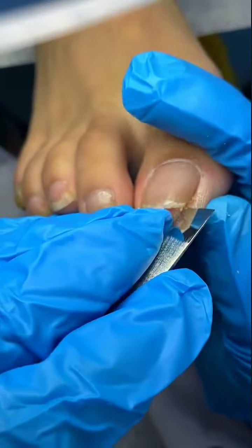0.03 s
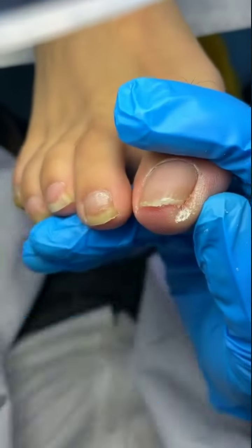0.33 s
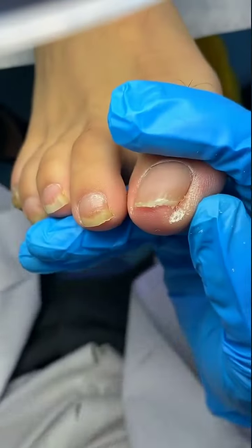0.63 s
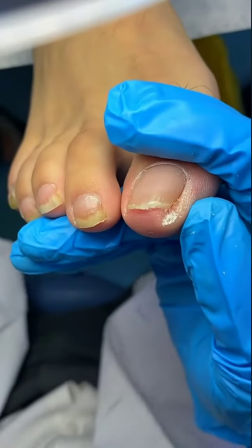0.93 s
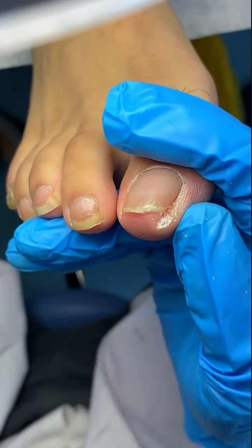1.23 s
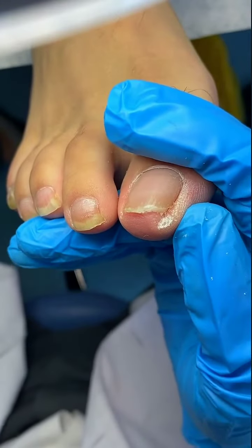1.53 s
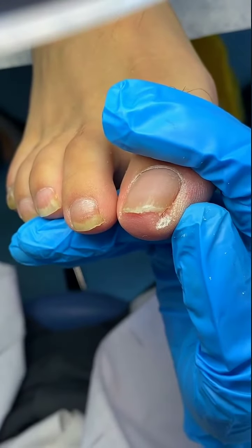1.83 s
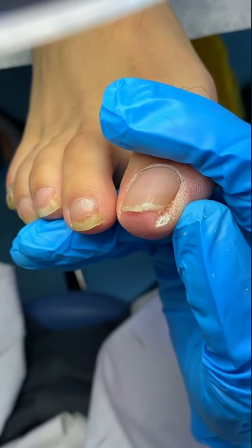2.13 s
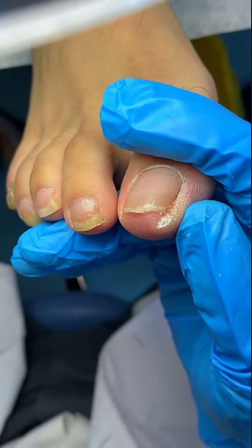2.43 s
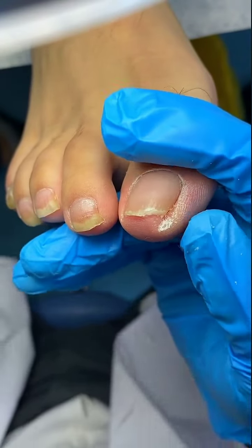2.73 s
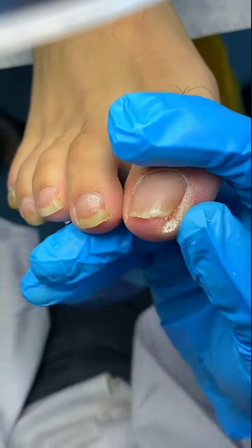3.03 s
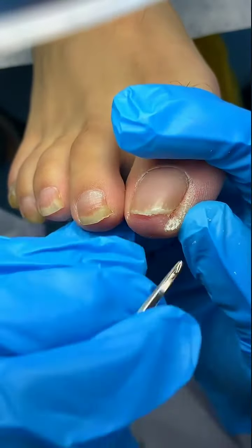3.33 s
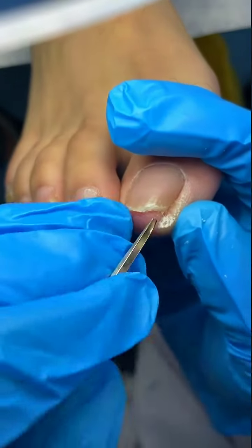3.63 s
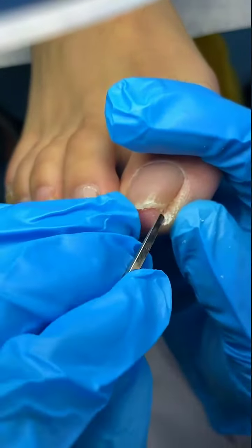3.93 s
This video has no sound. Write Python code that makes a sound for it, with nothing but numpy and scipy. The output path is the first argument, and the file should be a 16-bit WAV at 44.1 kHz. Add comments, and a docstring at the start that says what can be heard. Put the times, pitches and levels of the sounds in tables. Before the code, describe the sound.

Small steel instruments clink on a metal tray over quiet ventilation hum and rustling.

```python
"""In a small, fairly live room, steel instruments are put down on a metal tray and another is picked up.
Each impact gives a short clatter and excites the natural modes of tray and instrument, which ring on;
the trolley underneath answers with dull, heavily damped knocks. Close by, gloves and sleeves make
friction noise over the steady hum of the ventilation."""
import sys
import numpy as np
from scipy import signal
from scipy.fft import rfft, irfft
from scipy.io import wavfile

SR = 44100
rng = np.random.default_rng(int(sys.argv[2]) if len(sys.argv) > 2 else 0)


def wrap_up_sound(samples):
    """Save the sound to the file named by the first command line argument, as 16-bit audio."""
    columns = np.atleast_2d(samples).T
    # keep every value between -1 and 1, then stretch to whole-number steps
    tamed = np.clip(columns, -1, 1)
    steps = np.round(tamed * 32767).astype(np.int16)
    wavfile.write(sys.argv[1], SR, steps)


N = 176400
T = np.arange(N) / SR
HZ = np.maximum(np.fft.rfftfreq(N, 1 / SR), 1)
ATTACK_S = 0.00074

# steel lands on the tray and bounces: start_s, clatter_db, tray_ring_db, edge_hz, clatter_t60_s
LANDINGS = [(0.646, -20, -8.5, 4170, 0.052), (0.653, -23, -8.5, 4170, 0.034),
            (0.8175, -19.5, -0.5, 7140, 0.072)]


def from_db(db):
    """Amplitude ratio of a level in decibels."""
    return 10 ** (np.asarray(db) / 20)


def unit_rms(x):
    """Normalisation to an rms of 1."""
    return x / np.sqrt(np.mean(x ** 2) + 1e-20)


def at_hz(points, hz=HZ):
    """Interpolation of a curve on a logarithmic frequency axis."""
    frequency, value = np.transpose(points)
    return np.interp(np.log(hz), np.log(frequency), value)


def noise(gain):
    """Spectral shaping: white noise weighted by a gain at each frequency, at unit rms."""
    return unit_rms(irfft(rfft(rng.standard_normal(N)) * gain, N))


def diffuse(gain):
    """Diffuse field: stereo noise whose two sides are coherent in the bass and only partly so above."""
    # likeness of left and right: frequency_hz, coherence
    coherence_curve = [(100, 1), (180, 1), (350, 0.94), (700, 0.24), (1400, 0.37), (3000, 0.43),
                       (6000, 0.06), (12000, 0.9)]
    coherence = at_hz(coherence_curve)
    weights = np.sqrt([1 + coherence, 1 - coherence])
    mid, side = irfft(rfft(rng.standard_normal((2, N))) * gain * weights, N)
    return unit_rms(np.array([mid + side, mid - side]))


def struck(age, t60, rise_s=ATTACK_S):
    """Damped vibration: a quick rise, then exponential decay by 60 dB in t60 seconds."""
    age = np.maximum(age, 0)
    return (1 - np.exp(-age / rise_s)) * np.exp(-np.log(1000) * np.minimum(age / t60, 2))


def contact(start, db, t60, colour, edge_hz=SR):
    """Modal overlap: an impact's dense, short-lived resonances merge into a burst of noise."""
    gain = from_db(at_hz(colour)) / np.sqrt(1 + (HZ / edge_hz) ** 4)
    return from_db(db) * struck(T - start, t60) * noise(gain)


def ring(start, db, modes, spread_hz, rise_s=ATTACK_S, count=5):
    """Free vibration: each decaying mode is a cluster of close partials that beat."""
    out, first = np.zeros(N), int(start * SR)
    span = slice(first, first + SR)
    age = T[span] - start
    for hz, mode_db, t60 in modes:
        offsets = np.linspace(-1, 1, count) + rng.uniform(-1.16, 1, count) / count
        partials = hz + spread_hz * offsets
        waves = np.sin(2 * np.pi * (partials[:, None] * age + rng.random((count, 1))))
        envelope = struck(age, t60, rise_s)
        tone = envelope * (np.hanning(count + 2)[1:-1] @ waves)
        to_sine_energy = np.sqrt(np.sum(envelope ** 2) / (2 * np.sum(tone ** 2)))
        out[span] += from_db(db + mode_db) * tone * to_sine_energy
    return out


def rustle(strokes, colour):
    """Friction noise swells and fades with each stroke; incoherent strokes add in power."""
    power = sum(from_db(db) ** 2 * np.exp(-2 * ((T - peak) / np.where(T < peak, rise, fall)) ** 2)
                for peak, rise, fall, db in strokes)
    return np.sqrt(power) * diffuse(from_db(at_hz(colour)))


def ventilation(air_db=-32.5):
    """Broadband air noise with hum lines, which waver because each is a narrow band of noise."""
    # hum lines: centre_hz, level_db, half_width_hz
    lines = [(44.8, -42, 1.3), (58.6, -38, 1.3), (91.05, -36.5, 5.8), (202.2, -49, 5.3), (338.6, -52, 5.5),
             (520.7, -55.5, 2.1), (754, -62.5, 24)]
    # spectrum of the moving air: frequency_hz, level_db
    air = [(12, -49), (20, -4), (30, -5.5), (44, 3.5), (95, -9.5), (109, -15.5), (122, -9.5), (196, -18),
           (306, -13), (362, -20.5), (478, -22), (534, -17.5), (597, -23), (985, -24.5), (1670, -33.5),
           (2470, -34), (2680, -36), (5000, -39.5), (6100, -46.5), (6720, -59), (15500, -57)]
    hum = sum(from_db(db) * noise(1 / (1 + ((HZ - hz) / width) ** 2)) for hz, db, width in lines)
    return hum + from_db(air_db) * diffuse(from_db(at_hz(air)))


def pick_rings():
    """Weak excitation: two picks, barely touched, ring faintly in a few modes."""
    # modes of the finer pick and of the other: pitch_hz, level_db, t60_s
    fine_pick = [(2694, -53, .2), (3182, -47, .17)]
    pick = [(2444, -57, .3), (2694, -51, .35), (2943, -52, .35)]
    return (ring(0.005, 1.5, fine_pick, spread_hz=11, rise_s=0.00089)
            + ring(0.086, 4, pick, spread_hz=14, rise_s=0.0028)
            + ring(0.457, 7.5, pick, spread_hz=35, rise_s=0.0049))


def gloves(crinkle_db=1.5, crinkle_hz=118, snap_wet_db=-25):
    """Many tiny contacts modulate the friction noise of sliding gloves; light snaps excite the room."""
    # light snaps: start_s, level_db, t60_s
    snap_events = [(0.069, -34, 0.017), (0.814, -31.5, 0.029), (0.938, -39, 0.04), (1.395, -41.5, 0.038),
                   (2.454, -42, .04), (3.024, -53, .06)]
    # sliding strokes: peak_s, rise_s, fall_s, level_db
    slides = [(0.305, 0.029, 0.054, -41), (0.44, 0.32, 0.17, -48), (0.96, 0.39, 0.19, -55.5),
              (1.55, 0.25, .15, -59.5), (2.12, 0.21, 0.068, -63), (2.6, 0.31, 0.55, -54),
              (3.02, 0.1, 0.031, -42), (3.25, 0.13, 0.19, -55)]
    # spectrum of the gloves: frequency_hz, level_db
    colour = [(2000, 3), (5700, 6.5), (7200, -13), (9000, 0), (11000, 2.5), (13000, -0.5), (15500, -4)]
    snaps = sum(contact(*snap, colour) for snap in snap_events)
    flutter = noise(1 / (1 + (HZ / crinkle_hz) ** 2))
    crinkle = unit_rms(from_db(crinkle_db * flutter))
    return crinkle * rustle(slides, colour) + snaps + from_db(snap_wet_db) * room(snaps)


def clothing():
    """Sliding friction: a dull rub as the body shifts, a brighter hiss as sleeves brush."""
    # movements of body and sleeves: peak_s, rise_s, fall_s, level_db
    shifts = [(0.29, 0.062, 0.1, -40.5), (0.65, 0.02, 0.019, -35.5), (2.82, 0.082, 0.093, -33),
              (3.04, 0.097, 0.098, -34.5), (3.5, 0.45, 0.52, -41.5), (3.92, 0.073, 0.097, -34)]
    brushes = [(0.31, 0.068, 0.25, -45), (2.56, 0.22, 0.38, -51), (2.84, 0.19, 0.17, -41.5),
               (2.99, 0.053, 0.29, -45.5), (3.48, 0.046, 0.16, -51), (3.93, 0.094, 0.11, -46)]
    # their spectra: frequency_hz, level_db
    rub = [(70, -49), (150, -1), (215, 4.5), (330, -4.5), (500, -6), (1000, -15), (3000, -47)]
    sleeve = [(200, -16), (600, -3.5), (1500, -1), (2500, 4.5), (4000, 2.5), (5900, -7), (6800, -36),
              (15000, -17)]
    return rustle(shifts, rub) + rustle(brushes, sleeve)


def trolley_knocks(spread_hz=23):
    """Blows on the trolley excite the low, heavily damped modes of its shelf and frame."""
    # dull knocks: start_s, level_db, t60_s, edge_hz
    blows = [(0.587, -22, 0.029, 776), (0.82, -23, 0.056, 485), (1.321, -29.5, 0.25, 1260),
             (1.398, -23.5, 0.26, 2460), (2.456, -29.5, 0.41, 870), (2.785, -30.5, 0.29, 735)]
    # their spectrum: frequency_hz, level_db
    colour = [(80, -6.5), (200, 0), (380, -1.5), (580, -5.5), (800, -11), (1200, -12.5), (2500, -14.5),
              (6000, -25)]
    # blows on shelf and frame: start_s, level_db
    thuds = [(0.589, -12), (1.322, -10), (1.398, -1), (2.456, -12), (2.786, -16)]
    bumps = [(1.405, 0), (1.528, -12)]
    # modes of shelf and frame: pitch_hz, level_db, t60_s
    shelf_modes = [(347, -21, 0.087), (430, -24.5, 0.22), (760, -22, 0.044), (843, -29.5, 0.079)]
    frame_modes = [(125, -10.5, 0.091), (187.5, -21, .1)]
    knocks = sum(contact(start, db, t60, colour, edge_hz) for start, db, t60, edge_hz in blows)
    shelf = sum(ring(start, db, shelf_modes, spread_hz) for start, db in thuds)
    frame = sum(ring(start, db, frame_modes, spread_hz, rise_s=0.0063) for start, db in bumps)
    return knocks + shelf + frame


def steel_scrapes():
    """Friction of steel slipping on steel gives brief bursts of noise, strongest at 2-3 kHz."""
    # slips: start_s, level_db, t60_s
    slips = [(0.599, -23.5, 0.0068), (1.395, -28.5, 0.039), (2.452, -28.5, 0.052), (3.666, -33.5, 0.016)]
    # their spectrum: frequency_hz, level_db
    colour = [(500, -18), (1750, 1), (2300, 8), (2900, 7), (3600, -1.5), (5400, -7.5), (6300, -23),
              (7200, -25.5)]
    return sum(contact(*slip, colour) for slip in slips)


def steel_ticks():
    """Hard contacts of steel on steel are brief, so their spectrum is broad."""
    # ticks: start_s, level_db, t60_s
    ticks = [(0.599, -37, 0.0072), (0.6468, -33, 0.018), (0.8172, -46, 0.008), (2.709, -21.5, 0.013),
             (2.7132, -25, 0.021), (2.719, -28, .025)]
    # their spectrum: frequency_hz, level_db
    colour = [(1200, -6), (2200, -6), (2900, -0.5), (5000, -1.5), (5600, 1.5), (6400, -21), (8000, -25)]
    return sum(contact(*tick, colour) for tick in ticks)


def instrument_rings():
    """Struck steel vibrates in inharmonic modes: lightly damped ones ring, heavily damped ones clack."""
    # modes of each instrument, and of the handle's clack on the tray: pitch_hz, level_db, t60_s
    blade = [(2645, -35, .5), (2700, -38, .5), (2785, -34, .55), (2805, -36, .45), (2935, -37, .4),
             (3128, -30, .12), (3900, -34, .06), (4430, -48, .4), (5066, -47, .3)]
    clack = [(3943, -18.5, 0.021), (4880, -29.5, 0.027)]
    handle = [(3536, -41, .46), (3655, -41, .45), (3770, -43, .3), (3865, -38, .4), (3911, -33, .36),
              (4020, -41, .3), (4134, -45, .5), (4528, -41, .5), (4780, -46, .35), (4910, -40, .35),
              (5216, -45, .38), (5373, -47, .2), (6095, -52, .4), (6422, -46, .33)]
    probe = [(1730, -43, .45), (2509, -41, .35), (3515, -25, .42), (6585, -54, .7), (6594, -54, .7),
             (8280, -61, .3)]
    nippers = [(2207, -28, 0.084), (2490, -25.5, 0.05), (3270, -30.5, 0.059), (3780, -32, 0.095),
               (4000, -41, 0.047), (4720, -36, 0.043), (4910, -26, 0.028), (5220, -31, 0.036),
               (5470, -40, 0.026), (6570, -44, 0.086)]
    tweezers = [(2300, -46, 0.09), (2560, -47, .09)]
    return (ring(0.645, 0, blade, spread_hz=23, rise_s=0.00088)
            + ring(0.8164, 5, clack, spread_hz=44, rise_s=0.00042)
            + ring(0.818, 1, handle, spread_hz=14.3, rise_s=0.002)
            + ring(0.825, -0.5, clack, spread_hz=26, rise_s=0.00038)
            + ring(1.407, -1.5, probe, spread_hz=0.29, rise_s=0.021)
            + ring(2.7075, 1.5, nippers, spread_hz=145, rise_s=0.00037)
            + ring(2.726, -8.5, nippers, spread_hz=140, rise_s=0.001)
            + ring(3.461, 6, tweezers, spread_hz=150, rise_s=0.0046))


def tray_clatter():
    """Impact noise: each landing briefly excites many resonances at once."""
    # spectrum of the clatter: frequency_hz, level_db
    colour = [(300, -41), (800, -21), (1220, 4.5), (1430, -7), (2050, 3.5), (2750, 2.5), (3350, -6),
              (3900, 3), (4300, -12), (5100, -3.5), (6200, -10), (7000, -20), (15000, -15)]
    return sum(contact(start, db, t60, colour, edge_hz) for start, db, _, edge_hz, t60 in LANDINGS)


def tray_rings():
    """The tray is a thin plate whose bending modes ring on after each landing."""
    # plate modes: pitch_hz, level_db, t60_s
    modes = [(1066, -42, .45), (1222, -39.5, .45), (1272, -40.5, .55), (1578, -41, .6), (1694, -42, .6),
             (1960, -40, .45), (2008, -38, .45), (2209, -40.5, .45), (2363, -44, .6), (2533, -42, .8),
             (2604, -37.5, .6), (2715, -40, .55), (3170, -45, .35)]
    return sum(ring(start, db, modes, spread_hz=16.4) for start, _, db, _, _ in LANDINGS)


def near_echoes(x, level_db=-3, earliest_s=0.001, latest_s=0.012, count=6):
    """Early reflections from tray rim, trolley and wall: delayed copies, different on each side."""
    lags = (rng.uniform(earliest_s, latest_s, (2, count)) * SR).astype(int)
    echoes = [sum(rng.choice([-1, 1]) * np.pad(x, (lag, 0))[:N] for lag in side) for side in lags]
    return from_db(level_db) * np.array(echoes) / np.sqrt(count)


def room(x, first_echo_s=0.0051, bands=9):
    """Reverberation: convolution with a diffuse tail that decays at its own rate in each band."""
    # reverberation time: frequency_hz, t60_s
    decay = [(150, 0.98), (600, 0.75), (2500, 0.93), (5000, 0.55), (12000, 0.28)]
    spectrum, tail = rfft(diffuse(1)), 0
    edges = np.geomspace(60, SR / 2, bands + 1)
    for low, high in zip(edges, edges[1:]):
        band = irfft(spectrum * ((HZ >= low) & (HZ < high)), N)
        envelope = struck(T - first_echo_s, at_hz(decay, np.sqrt(low * high)))
        tail = tail + band * envelope / np.sqrt(np.sum(envelope ** 2))
    return irfft(rfft(tail, 2 * N) * rfft(x, 2 * N))[:, :N]


def scene(right_lag_s=0.00002):
    """Superposition at the microphone; sound from the tray arrives a little sooner on the left."""
    clatter = tray_clatter()
    rings = tray_rings() + pick_rings() + instrument_rings()
    ticks, scrapes, knocks = steel_ticks(), steel_scrapes(), trolley_knocks()
    steel = clatter + ticks + rings + scrapes
    into_room = from_db(-1) * (clatter + ticks + knocks) + from_db(-3) * rings + from_db(6) * scrapes
    tray = steel + knocks + near_echoes(steel) + room(into_room)
    delay = np.exp(-2j * np.pi * HZ * np.array([[0], [right_lag_s]]))
    return irfft(rfft(tray) * delay, N) + gloves() + clothing() + ventilation()


def record(dry, rumble_hz=34.5, cutoff_hz=15800):
    """Band limiting: the deepest rumble rolls off and the top is cut steeply."""
    high_pass = signal.butter(2, rumble_hz, "high", fs=SR, output="sos")
    low_pass = signal.ellip(12, 0.1, 80, cutoff_hz, fs=SR, output="sos")
    return signal.sosfilt(low_pass, signal.sosfilt(high_pass, dry))


dry = scene()
out = record(dry)
wrap_up_sound(out)
```